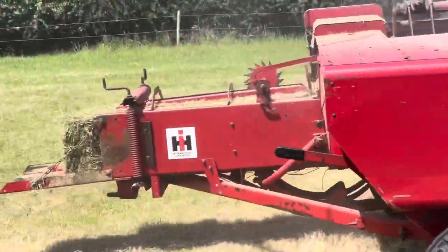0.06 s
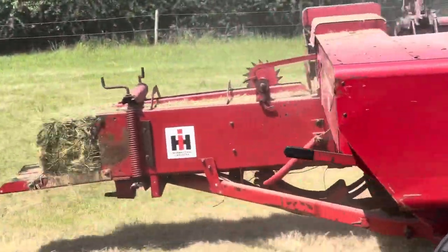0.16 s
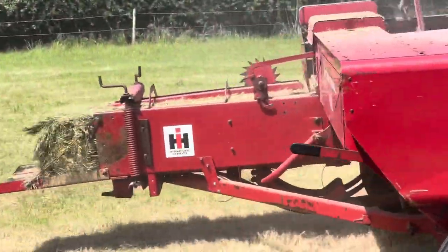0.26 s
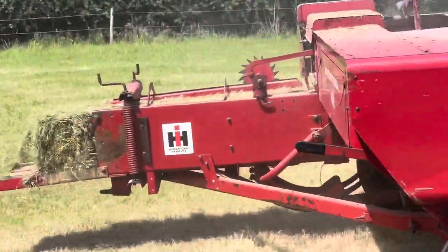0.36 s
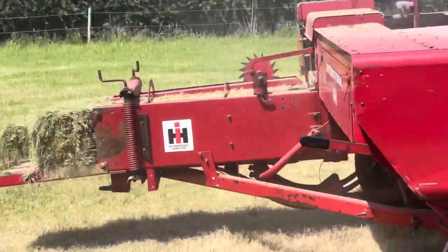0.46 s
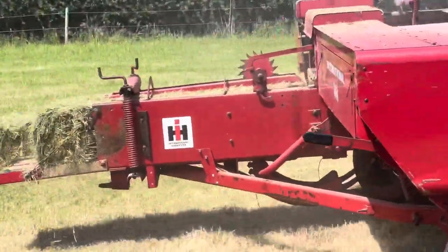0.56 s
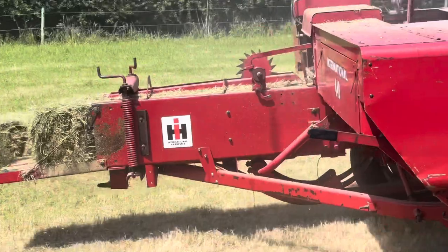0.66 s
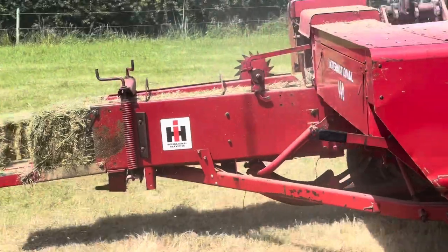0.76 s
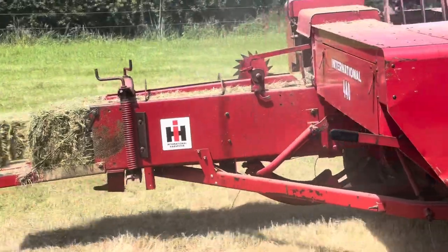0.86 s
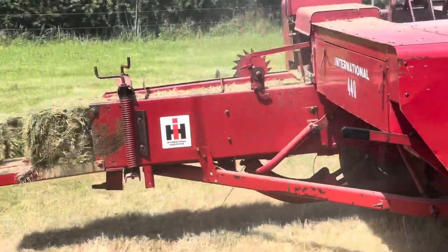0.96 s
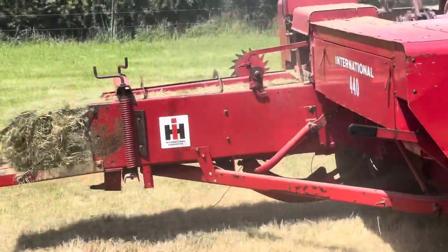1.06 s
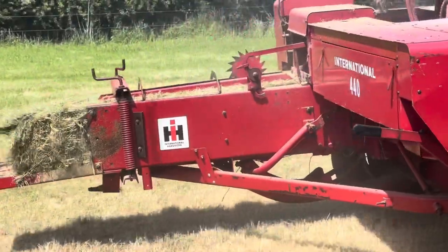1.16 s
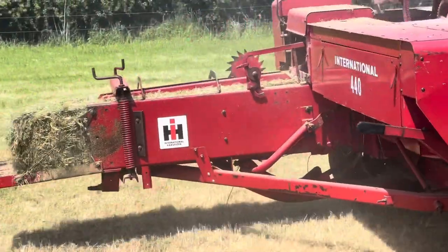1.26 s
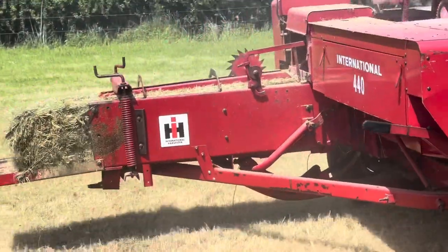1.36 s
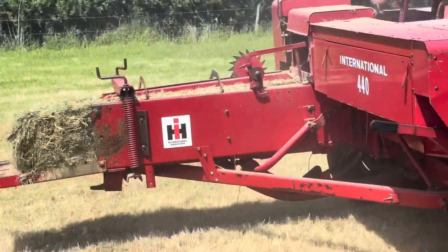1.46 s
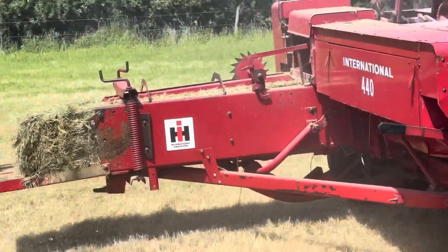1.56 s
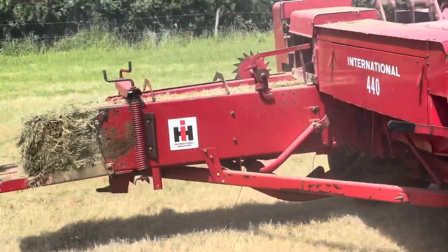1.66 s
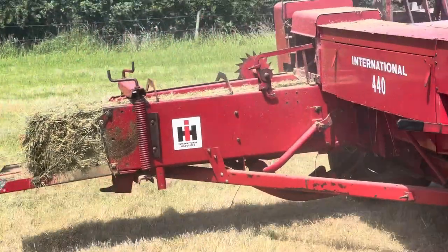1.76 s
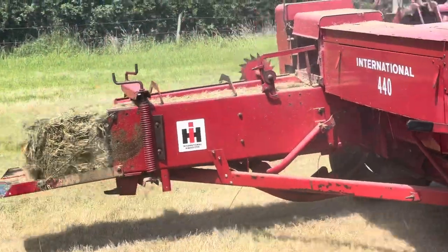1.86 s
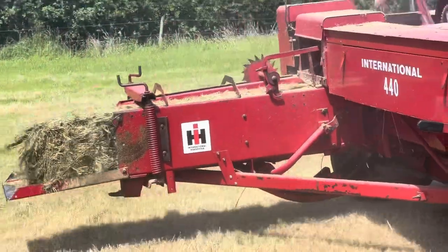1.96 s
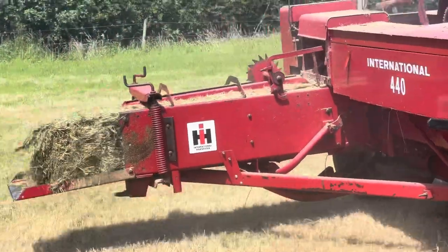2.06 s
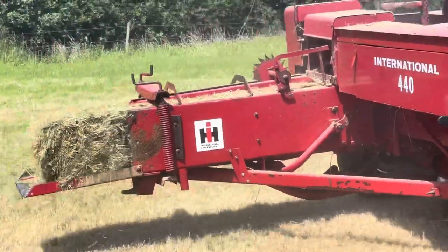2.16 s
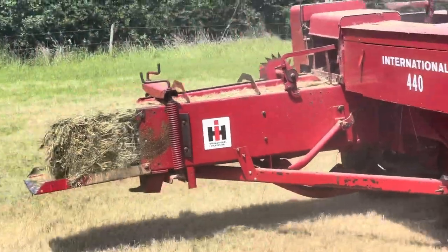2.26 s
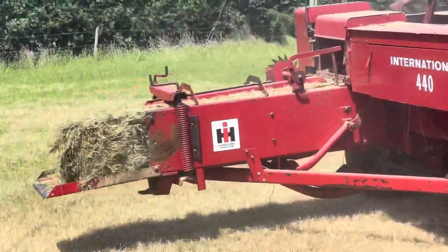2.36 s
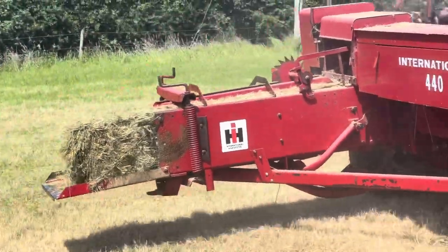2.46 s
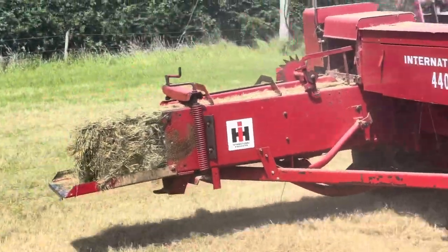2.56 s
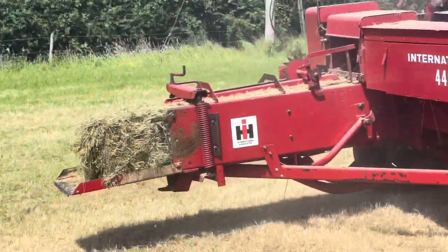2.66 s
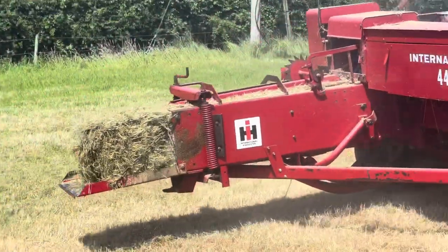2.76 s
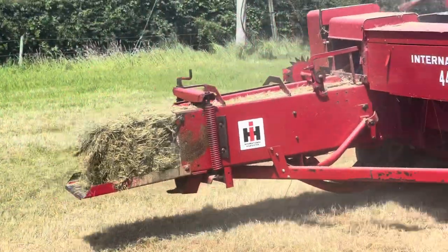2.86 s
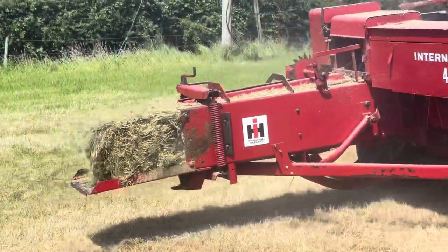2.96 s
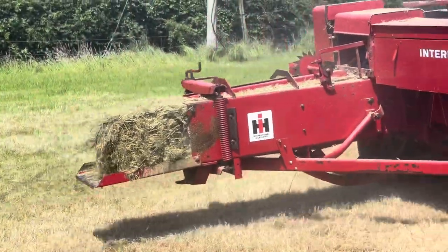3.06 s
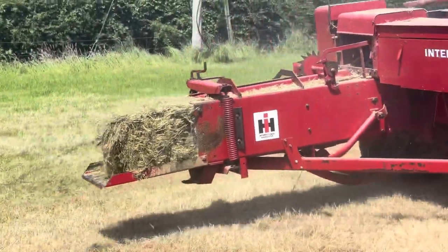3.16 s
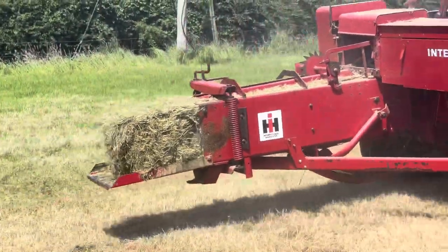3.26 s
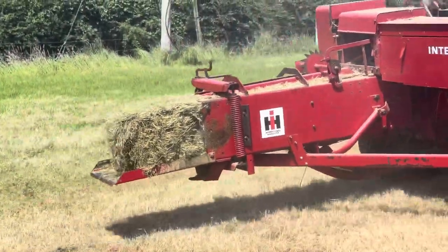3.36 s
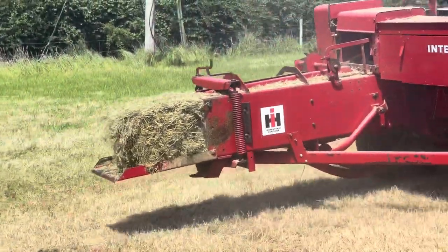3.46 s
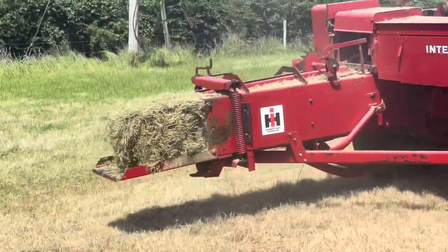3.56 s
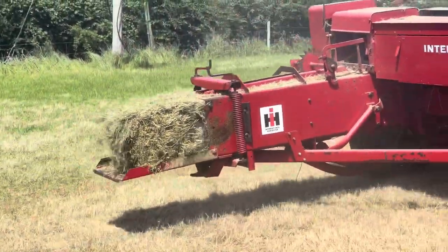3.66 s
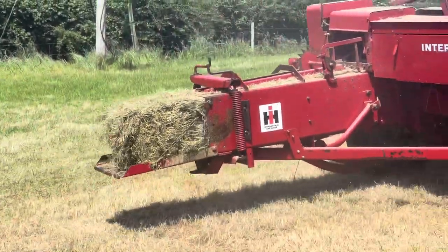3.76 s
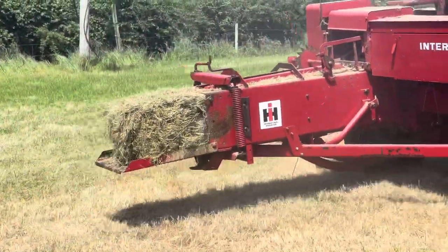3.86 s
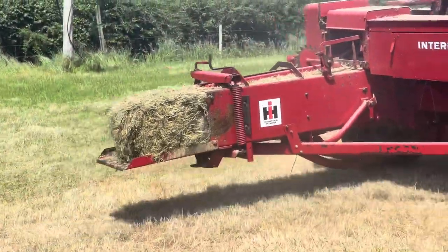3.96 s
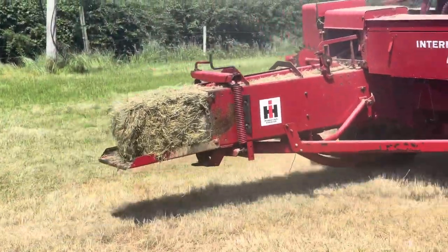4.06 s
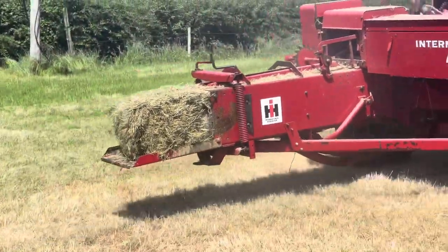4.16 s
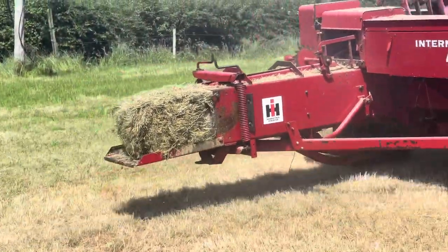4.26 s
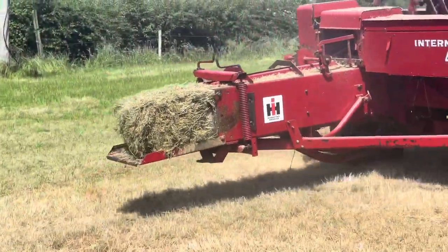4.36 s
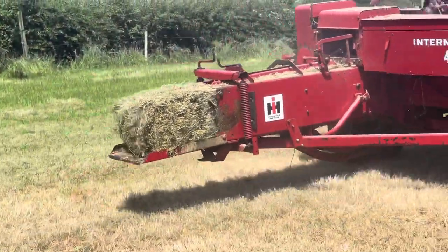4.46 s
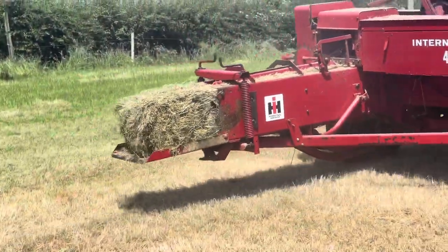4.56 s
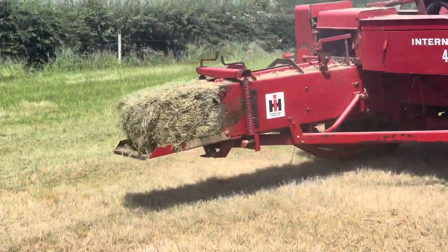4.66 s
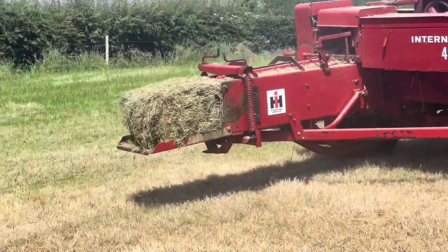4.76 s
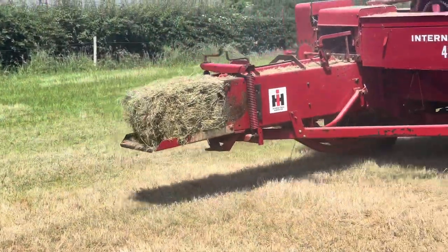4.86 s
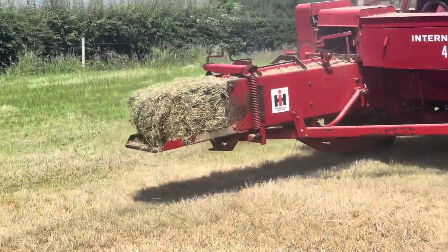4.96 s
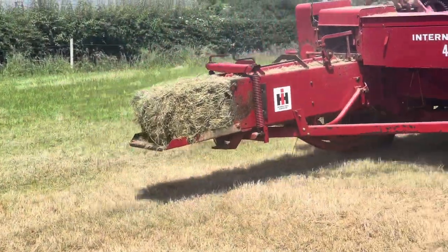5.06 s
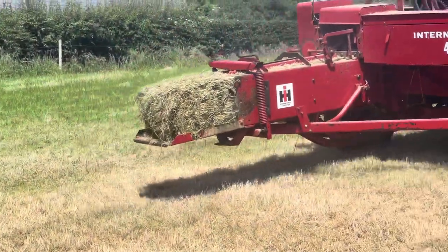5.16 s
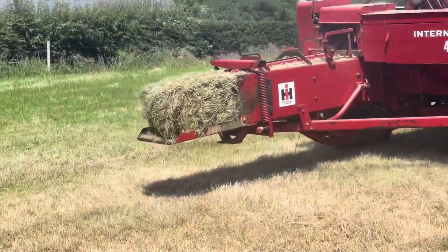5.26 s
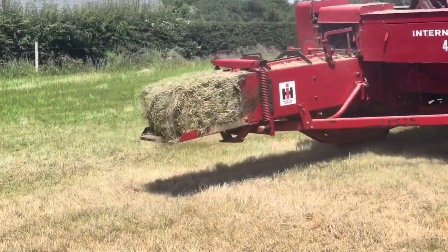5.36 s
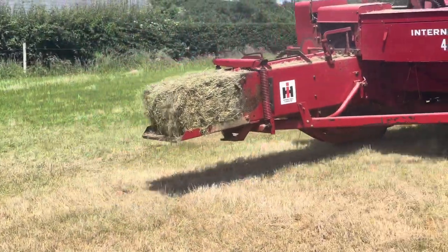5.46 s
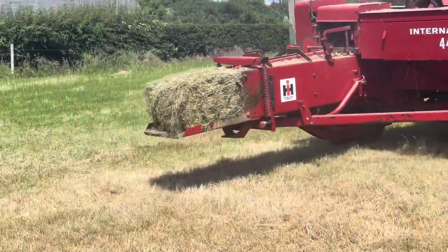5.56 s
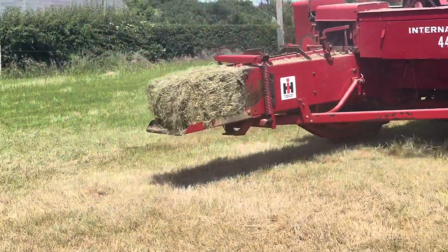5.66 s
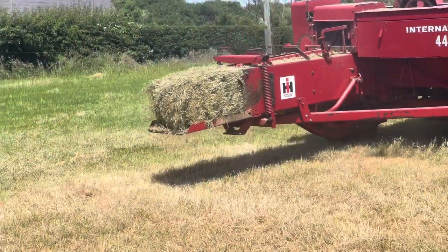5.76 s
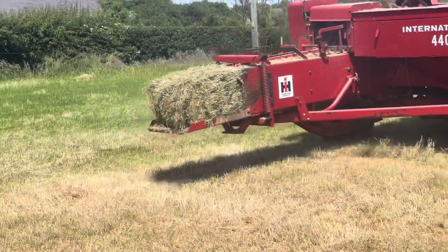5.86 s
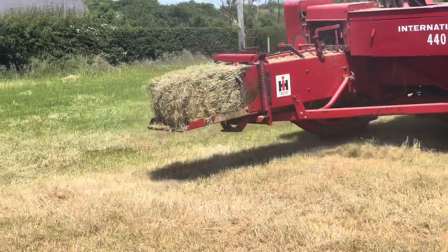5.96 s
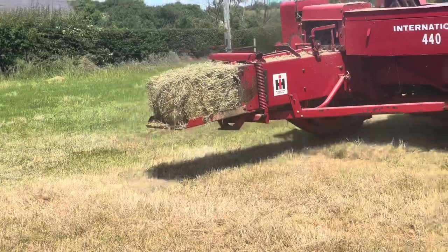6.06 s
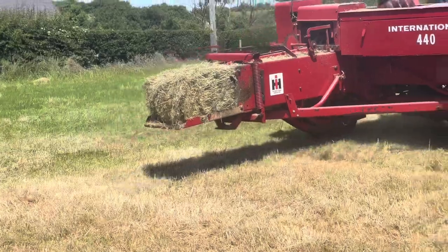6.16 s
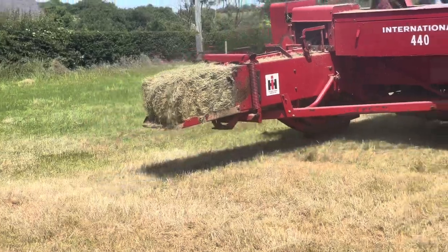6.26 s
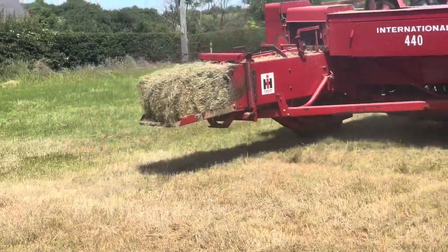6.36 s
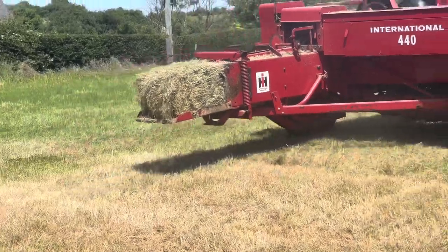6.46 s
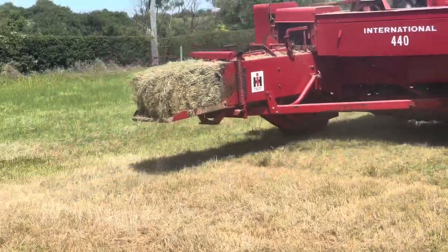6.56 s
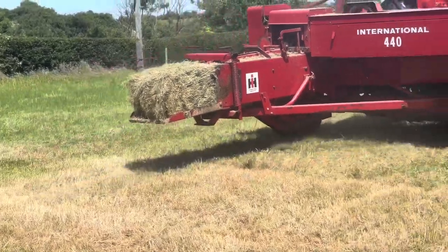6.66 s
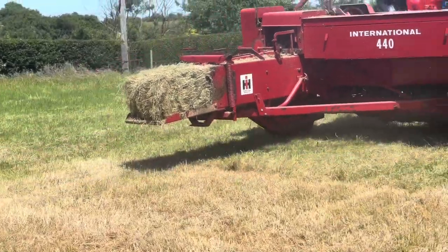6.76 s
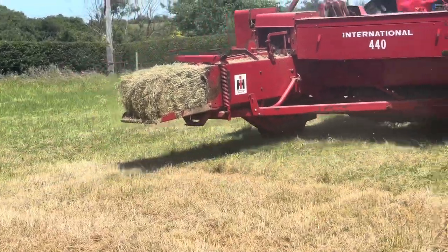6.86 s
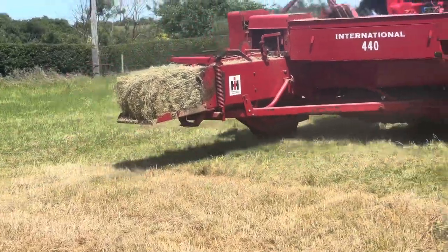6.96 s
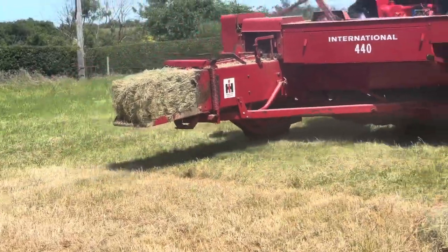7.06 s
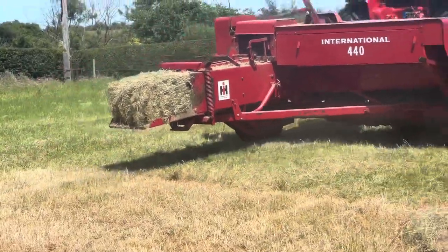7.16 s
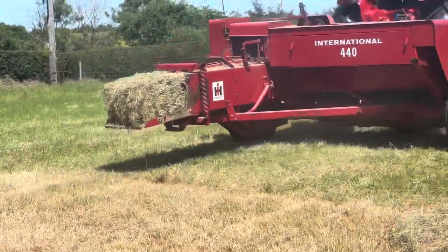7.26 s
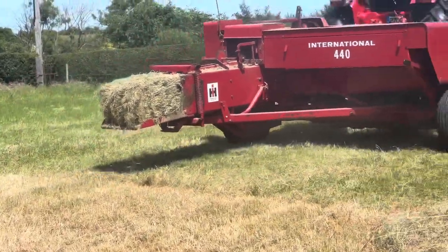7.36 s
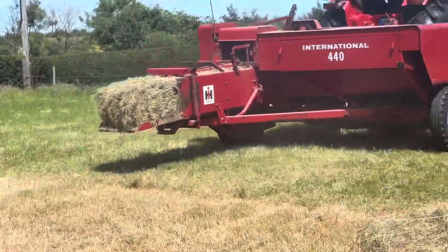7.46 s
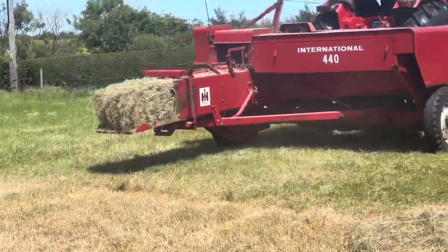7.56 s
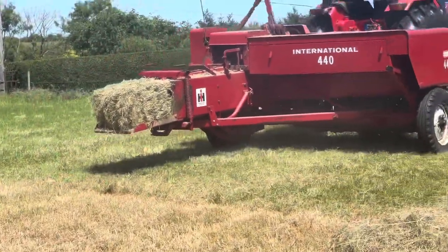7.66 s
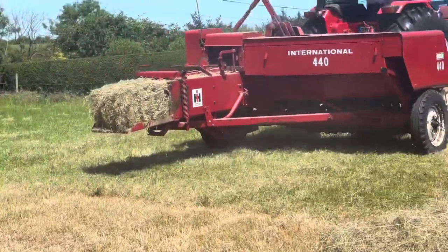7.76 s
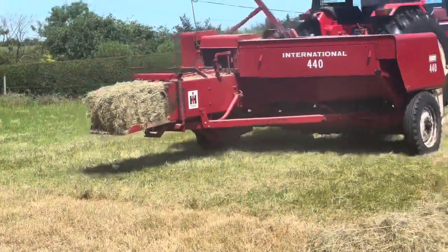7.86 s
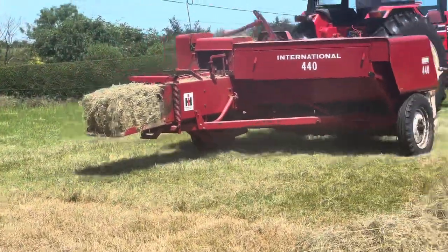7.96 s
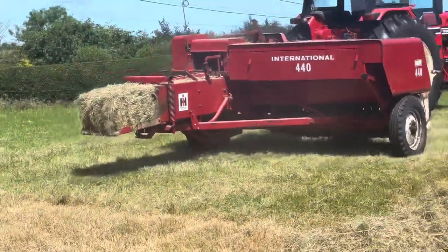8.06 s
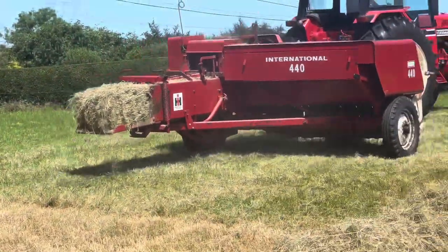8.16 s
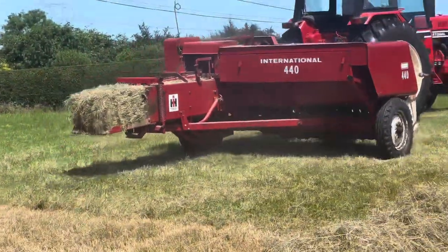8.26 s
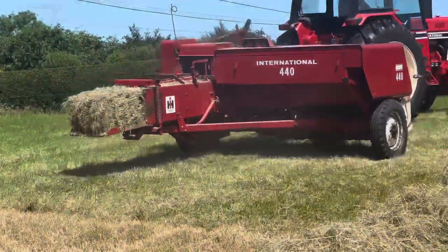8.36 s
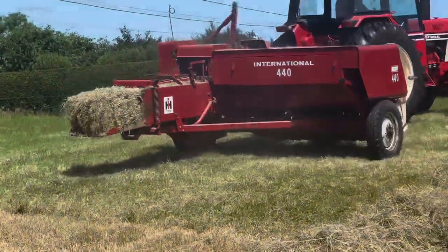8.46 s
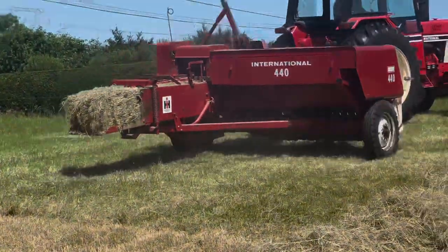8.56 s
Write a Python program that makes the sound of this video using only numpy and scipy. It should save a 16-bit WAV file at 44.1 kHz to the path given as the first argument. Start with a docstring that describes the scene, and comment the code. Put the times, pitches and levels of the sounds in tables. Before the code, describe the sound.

A hay baler works behind a droning tractor, with sharp regular plunger knocks, metallic ticking, chain clatter and hissing hay.

```python
"""Hay baler behind a diesel tractor

A small square baler works hay in an open field, drawing slowly away. The periodic firing of four
cylinders makes the exhaust drone; the sheet-steel body booms and clatters, gears whine and hay hisses.
Impacts excite resonant modes: the plunger knocks once a stroke and the pickup ticks five times a stroke.
Two close microphone ports hear it, and the peaks are limited and clipped."""
import sys
import numpy as np
from scipy import signal
from scipy.fft import rfft, irfft, next_fast_len
from scipy.io import wavfile
from scipy.ndimage import uniform_filter1d, minimum_filter1d, map_coordinates

SR = 44100
rng = np.random.default_rng(int(sys.argv[2]) if len(sys.argv) > 2 else 0)


def store_wav(level_fs):
    """Save 16-bit WAV to argv[1]."""
    pcm = np.round(np.clip(np.atleast_2d(level_fs), -1, 1) * 32767)
    wavfile.write(sys.argv[1], SR, pcm.T.astype(np.int16))


N = 380141
TIME = np.arange(N) / SR
FIRING_HZ, STROKE_S = 66.36, .8567  # mean firing rate; one turn of the plunger crank
SHARED = [[1], [0]]  # row 0 is common to both ports, row 1 is scattered sound


def amp(db):
    return 10 ** (np.asarray(db) / 20)

def unit_rms(x):
    return x / np.sqrt(np.mean(x ** 2) + 1e-20)

def log_interp(points, hz):
    """Interpolation on a logarithmic frequency axis."""
    knots_hz, values = np.transpose(points)
    return np.interp(np.log(hz + 1), np.log(knots_hz + 1), values)

def curves(rows):
    """Linear interpolation in time, one curve for each later column."""
    times, *columns = np.transpose(rows)
    return [np.interp(TIME, times, column) for column in columns]

def wobble(rate):
    """Smooth random modulation: a spline with `rate` knots a second."""
    at = np.arange(0, N + 16, 16)
    knots = rng.standard_normal(int(N * rate / SR) + 4)
    return np.interp(np.arange(N), at, map_coordinates(knots, [at * rate / SR]))

def filtered(x, response):
    """Linear filtering: the spectrum times a frequency response."""
    size = next_fast_len(N + 8192)
    return irfft(rfft(x, size) * response(np.fft.rfftfreq(size, 1 / SR)), size)[..., :N]

def noise(spectrum, envelope):
    """Two independent noises under one envelope, coloured, at unit rms."""
    white = envelope * rng.standard_normal((2, N))
    return unit_rms(filtered(white, lambda hz: amp(log_interp(spectrum, hz))))


# Firing tone (time [s], level [dB])
FIRING_LEVEL = [(0, -20), (.3, -16), (1.3, -16), (2.4, -20), (3.2, -15), (4.2, -19), (5.3, -16.5),
                (5.8, -17), (6.7, -24.5), (7.3, -11), (7.7, -17.5), (8.15, -17), (8.35, -32), (8.62, -30)]
# Shaft orders (multiple of the firing rate, relative level [dB])
SHAFT_ORDERS = [(0.501, -36), (.75, -30), (1.25, -20.5), (1.5, -9.5), (2, -7), (2.5, -18.5), (3, -15.5),
                (4, -19), (5, -15.5)]

def engine(boom_db, sag_hz=.72, sag_skew=.3, mesh_order=60, mesh_db=-25.5):
    """Frequency modulation: each stroke's load swings the firing tone, which beats with a steady gear."""
    crank = 2 * np.pi * (TIME - .78) / STROKE_S
    swing = np.sin(crank) - sag_skew / 2 * np.cos(2 * crank)  # quick drop, slow recovery
    firing_phase = 2 * np.pi * FIRING_HZ * TIME + sag_hz * STROKE_S * swing + .05 * wobble(6)
    orders = sum(amp(db + 3.74 * wobble(7)) * np.sin(order * firing_phase + 1.21 * wobble(3))
                 for order, db in SHAFT_ORDERS)
    orders *= amp(.5 * (boom_db - boom_db.mean()) - 16.5)  # radiated by the booming panels
    mesh_cycles = FIRING_HZ * .02 + mesh_order / STROKE_S * (TIME - .02)  # first beat near 0.02 s
    mesh = amp(mesh_db) * np.sin(2 * np.pi * mesh_cycles)
    level_db, = curves(FIRING_LEVEL)
    tone = amp(level_db + 1.1 * wobble(5)) * np.sin(firing_phase)
    return np.sqrt(2) * (tone + mesh + orders) * SHARED, firing_phase


# Panel boom (time [s], level [dB])
PANEL_LEVEL = [(0, -9.5), (.9, -9), (1.5, -12.5), (1.9, -8.5), (2.35, -17), (2.65, -11), (3.5, -13),
               (4.1, -14), (4.7, -14), (5.9, -14.5), (6.6, -16.5), (7, -13.5), (7.45, -17.5), (8.25, -14.5),
               (8.32, -26), (8.55, -17.5), (8.62, -28)]
# Lull at plunger reversal (time [s], depth [dB])
REVERSAL_DIP = [(0, 4.5), (4.5, 4), (8.62, 0)]

def boom_level(first_lull_s=.21, lull_width_s=.059):
    """Amplitude modulation, in dB: the panels swell each half stroke and lull as the plunger reverses."""
    level_db, = curves(PANEL_LEVEL)
    depth_db, = curves(REVERSAL_DIP)
    half = STROKE_S / 2
    from_lull = (TIME - first_lull_s + half / 2) % half - half / 2
    lull = np.exp(-.5 * (from_lull / lull_width_s) ** 2)
    swell_db = np.sin(-2 * np.pi * from_lull / half)
    return level_db + depth_db * (lull.mean() - lull) + swell_db + 2.34 * wobble(14)


# Boom spectrum (frequency [Hz], relative density [dB])
BOOM_SPECTRUM = [(15, -49), (32, -23), (50, -18), (82, -20), (100, -7), (120, -0.5), (139, 1.5),
                 (200, -8.5), (260, -21), (340, -74), (570, -120)]
# Growl spectrum (frequency [Hz], relative density [dB])
GROWL_SPECTRUM = [(120, -44), (200, -2.5), (248, -7), (322, -4.5), (366, -8), (415, -13), (645, -17),
                  (700, -23), (800, -14), (1040, -44), (1760, -120)]

def panels(firing_phase, boom_db, growl_db):
    """Forced vibration: steel panels radiate two low noise bands that pulse with the firings."""
    boom = noise(BOOM_SPECTRUM, 1 + .13 * np.cos(firing_phase))
    power = np.abs(uniform_filter1d(boom[0] ** 2, 1800))
    steady_boom = unit_rms(boom / (power + .037) ** .475)  # most random swelling is divided out
    growl = amp(growl_db + 1.3 * wobble(3.984)) * noise(GROWL_SPECTRUM, 1 + .2 * np.cos(firing_phase))
    return amp(boom_db) * steady_boom + growl


# Chain clatter (frequency [Hz], relative density [dB])
CHAIN_SPECTRUM = [(320, -15.5), (550, -1.5), (644, -4), (694, -5), (782, -1.5), (1050, -3), (1240, -0.5),
                  (1440, -3), (1680, -10), (1880, -2.5), (2120, -5.5), (2520, -5), (2930, -12), (3300, -20),
                  (4290, -27), (7260, -120)]

def chains(firing_phase, jolts):
    """Dense impacts merge into noise that pulses with the firings."""
    pulse = 1 + .063 * np.cos(firing_phase)
    return noise(CHAIN_SPECTRUM, pulse * amp(.94 * jolts + .65 * wobble(200)))


# Hay hiss (frequency [Hz], relative density [dB])
HAY_SPECTRUM = [(2300, -22), (3000, 2), (4400, -1.5), (5300, -5), (7000, -4.5), (9000, -10.5),
                (11000, -22.5), (13000, -21), (16500, -23)]

def hay(jolts):
    """Friction noise: hay slides unevenly through the chamber."""
    return noise(HAY_SPECTRUM, amp(1.26 * jolts + .69 * wobble(17) + 1.1 * wobble(300)))


# Gear meshes (mean frequency [Hz], starting level [dB])
GEAR_TONES = [(314.5, -30), (662, -37), (746, -36), (927, -36), (2340, -40), (2530, -36)]

def gears(firing_phase, clatter_db, wander_rad_per_hz=.0007, fade_db_per_s=.5):
    """Tooth-mesh tones follow the shaft speed and flicker under the uneven load."""
    rad_per_hz = firing_phase / FIRING_HZ
    tones = sum(amp(db + 3.94 * wobble(9)) * np.sin(hz * (rad_per_hz + wander_rad_per_hz * wobble(12)))
                for hz, db in GEAR_TONES)
    fade = amp(clatter_db - clatter_db[0] - fade_db_per_s * TIME)  # the baler turns away
    return fade * np.sqrt(2) * tones * SHARED


# Cylinder firings (place in the engine cycle [0-1], relative level [dB])
FIRINGS = [(.075, 0.5), (.335, -3), (.55, -8), (.82, -16)]
# Engine block modes (frequency [Hz], bandwidth [Hz], relative level [dB])
BLOCK_MODES = [(2488, 180, 0.5), (1870, 280, -10.5), (3410, 430, -17.5)]

def combustion(clatter_db, jitter_s=.00049, decay_s=.003):
    """Impulse excitation: each firing raps the block's resonances with a noise burst."""
    place, db = np.transpose(FIRINGS)
    cycles = np.arange(int(N / SR * FIRING_HZ / len(place)) - 1)[:, None]
    scatter = rng.standard_normal((len(cycles), len(place), 2))
    times = (cycles + place) * len(place) / FIRING_HZ + jitter_s * scatter[..., 0]
    raps = np.bincount((times * SR).astype(int).ravel(), amp(db + 1.7 * scatter[..., 1]).ravel(), N)
    bursts = signal.lfilter([1], [1, -np.exp(-1 / (decay_s * SR))], raps) * rng.standard_normal(N)
    block = lambda f: sum((-1) ** k * amp(level) * 1j * f * width / (hz * hz - f * f + 1j * f * width)
                          for k, (hz, width, level) in enumerate(BLOCK_MODES))
    return amp(clatter_db - 11) * unit_rms(filtered(bursts, block)) * SHARED


def clinks(per_s=60, softest_db=-48, centre_hz=5500, t60_s=.03):
    """Free decay: loose tines and links touch at random, each ringing at its own pitch."""
    out, t = np.zeros(N + SR), np.arange(SR // 20) / SR
    for place, size, pitch in rng.random((int(N / SR * per_s), 3)):
        hz = centre_hz * np.exp(1.1 * (pitch - .5))
        envelope = amp(softest_db - 3.5 * np.log(1 - size) - 60 * t / t60_s)
        out[int(place * N):][:len(t)] += envelope * np.sin(2 * np.pi * hz * t)
    return out[:N] * [[1], [.3]]


# Plunger knocks, and the pickup ticks that land right after them
# (time [s], crack [dB], ring [dB], ring centre [Hz], floor for outer modes [dB])
IMPACTS = [(0.0494, -13.5, -16.5, 2720, -6), (.1461, -12, -6.5, 1440, -13), (0.9926, -13, -11, 1320, -11),
           (1.0076, -18, -11, 1460, -12), (1.8664, -8.5, -7, 1330, -13), (2.7177, -11.5, -9.5, 2110, -15),
           (2.734, -12, -15, 1500, -3.5), (2.7646, -26, -17.5, 1270, -6.5), (2.8324, -35, -23, 2550, -13),
           (3.5747, -11, -13, 2050, -14), (4.4363, -13, -13, 2100, -11), (4.4688, -16.5, -18.5, 1130, -11),
           (5.2824, -14, -12, 1860, -13), (5.2906, -17.5, -11, 1610, -9.5), (5.314, -21, -16, 1040, -11),
           (6.1407, -17, -13.5, 2090, -16), (6.153, -18, -15, 1150, -7), (6.9968, -18, -16, 1850, -11),
           (7.004, -16.5, -18.5, 960, -4), (7.033, -18, -33, 1256, -10), (7.8596, -15.5, -16.5, 1600, -5.5),
           (7.8678, -19, -21, 1880, -10), (7.889, -23.5, -19, 1300, -10)]
# Bale chamber modes (frequency [Hz])
CHAMBER_MODES = [480, 617, 865, 970, 1157, 1290, 1433, 1501, 1616, 1867, 2056, 2270, 2474, 2804]
# Impact crack (frequency [Hz], relative density [dB])
CRACK_SPECTRUM = [(400, -21), (800, 14.5), (2500, 4), (4500, 2.5), (7000, 0.5), (9000, -6), (12000, -11),
                  (16500, -11)]

def stroke_impacts(hold_s=.0075, snap_t60_s=.012):
    """Modal response: a plunger knock, or a pickup tick just after it, cracks and rings briefly."""
    crack, ring, t = np.zeros(N + SR), np.zeros(N + SR), np.arange(SR // 4) / SR
    envelope = lambda t60_s: (1 - np.exp(-t / .00036)) * amp(-60 * np.maximum(t - hold_s, 0) / t60_s)
    hard_front = 1 + .8 * amp(-60 * t / snap_t60_s)
    for start_s, crack_db, ring_db, centre_hz, floor_db in IMPACTS:
        detune, strength = rng.standard_normal((2, len(CHAMBER_MODES)))
        pitches = CHAMBER_MODES * (1 + .012 * detune)
        nearness = 1 / (1 + (np.log(pitches / centre_hz) / .1) ** 2)
        levels = np.maximum(nearness, amp(floor_db)) * amp(1.9 * strength)
        modes = levels @ np.sin(2 * np.pi * pitches[:, None] * t)
        crack[round(start_s * SR):][:len(t)] += amp(crack_db) * envelope(t60_s=.077) * hard_front
        ring[round(start_s * SR):][:len(t)] += amp(ring_db) * envelope(t60_s=.072) * modes
    chatter = amp(1.3 * wobble(500))  # loose parts shake within the blow
    return crack[:N] * noise(CRACK_SPECTRUM, chatter) + ring[:N] * SHARED


# Pickup ticks (time [s], rattle [dB], ring [dB])
TINE_TICKS = [(.3194, -33, -40), (.5294, -25, -47), (.8475, -30, -45), (1.0294, -25, -31),
              (1.216, -25, -35), (1.37, -25.5, -39), (2.053, -24, -45), (2.243, -22.5, -43),
              (2.407, -24.5, -36), (3.0859, -24, -34), (3.271, -26, -37), (3.432, -20, -38),
              (3.6192, -24, -46), (3.783, -23, -35), (3.9548, -21, -40), (4.13, -21, -30),
              (4.301, -23, -32), (4.4818, -28, -34), (4.6454, -24, -35), (4.783, -26.5, -44),
              (4.804, -21, -30), (4.9784, -22.5, -40), (5.034, -28, -32), (5.154, -21.5, -39),
              (5.322, -28, -34), (5.492, -21.5, -23), (5.6365, -26, -36), (5.657, -23.5, -33),
              (5.8247, -23.5, -24), (6.003, -22, -33), (6.054, -26, -30), (6.1714, -22.5, -30),
              (6.1894, -32, -34), (6.338, -22, -34), (6.5166, -22.5, -32), (6.6034, -27, -25),
              (6.6752, -20.5, -35), (6.86, -23.5, -26), (7.2045, -33, -35), (7.3665, -19, -31),
              (7.3818, -26.5, -36), (7.5482, -23, -25), (7.7268, -25.5, -24.5), (7.9025, -27.5, -25),
              (8.0786, -27, -33), (8.2479, -23, -31), (8.419, -26.5, -28), (8.5953, -28.5, -30)]
# Tine modes (frequency [Hz], relative level [dB], 60 dB decay time [s])
TINE_MODES = [(3220, -9, .05), (4161, -8, .06), (4430, 2, 0.091), (5700, -6, .06), (6449, -5, .08),
              (6821, -5, .07), (8156, -11, .07), (8586, -10, .06)]
# Tine rattle (frequency [Hz], relative density [dB])
RATTLE_SPECTRUM = [(1500, -18), (3000, 3), (3900, -4.5), (4400, 3), (4900, -4), (6300, 2), (7500, 0.5),
                   (9000, -5), (12000, -13), (16500, -10)]

def pickup(rattle_s=.03):
    """Damped vibration: a tine bar snaps over its cam, rings thinly and rattles on."""
    rattle, ring, t = np.zeros(N + SR), np.zeros(N + SR), np.arange(SR // 4) / SR
    attack = 1 - np.exp(-t / .0018)
    decay = amp(-60 * t / .041) + .59 / (1 + (t / rattle_s) ** 4)
    for start_s, rattle_db, ring_db in TINE_TICKS:
        modes = sum(amp(db + 3.8 * rng.standard_normal() - 60 * t / t60)
                    * np.sin(2 * np.pi * hz * rng.normal(1, .0078) * t) for hz, db, t60 in TINE_MODES)
        rattle[round(start_s * SR):][:len(t)] += amp(rattle_db) * attack * decay
        ring[round(start_s * SR):][:len(t)] += amp(ring_db) * modes
    return rattle[:N] * noise(RATTLE_SPECTRUM, amp(2.1 * wobble(400))) + ring[:N] * SHARED


# Working noise (time [s], growl [dB], clatter [dB], hay hiss [dB])
WORK_LEVELS = [(0, -16.5, -20.5, -27.5), (1.03, -18.5, -20.5, -29.5), (1.85, -19, -20, -28.5),
               (3.2, -21.5, -22, -31.5), (4.4, -21, -21.5, -32.5), (5, -24, -22.5, -33),
               (5.54, -19, -23, -33), (6.1, -22.5, -23.5, -34.5), (6.9, -21, -25, -32.5),
               (7.56, -21, -25, -35), (8, -21, -21, -32.5), (8.3, -23, -23.5, -33), (8.62, -30, -28, -36.5)]

def scene():
    """Superposition: all sources add into a shared row and a scattered row."""
    growl_db, clatter_db, hiss_db = curves(WORK_LEVELS)
    boom_db = boom_level()
    mix, firing_phase = engine(boom_db)
    mix += panels(firing_phase, boom_db, growl_db)
    jolts = wobble(45)  # small knocks of links and bearings
    mix += amp(clatter_db) * chains(firing_phase, jolts) + amp(hiss_db) * hay(jolts)
    mix += gears(firing_phase, clatter_db) + combustion(clatter_db)
    return mix + stroke_impacts() + pickup() + clinks()


# Likeness of the ports (frequency [Hz], coherence [0-1])
PORT_COHERENCE = [(60, 0.99), (130, 0.99), (290, 0.99), (640, 0.98), (1410, 0.83), (2400, 1), (3300, 1),
                  (4400, 1), (7500, 1), (10000, 1), (15000, 1)]
# Port balance (frequency [Hz], left minus right [dB])
PORT_BALANCE = [(60, 0.7), (380, .5), (700, -1), (1290, -2), (2000, -1.5), (2600, -0.6), (3600, 0)]
# Port phase (frequency [Hz], left lead [rad])
PORT_PHASE = [(0, 0.029), (600, -0.41), (1120, -0.52), (1700, -0.3), (2300, 0.068), (3000, 0.39), (4000, 0)]
# Stereo width, narrowing over time (time [s], side gain [dB])
SIDE_GAIN = [(0, 5.5), (2, 4), (4, 3.5), (6, 1), (7.2, -2.5), (8.62, -7)]

def microphone_ports(dry, slip_above_hz=8900, slip_zero_hz=8400, hz_per_turn=3620):
    """Partial coherence: two close ports hear nearly the same sound, apart in level and phase."""
    spread = lambda hz: np.arccos(np.clip(log_interp(PORT_COHERENCE, hz), -1, 1)) / 2
    shared, scattered = filtered(dry, lambda hz: np.array([np.cos(spread(hz)), np.sin(spread(hz))]))
    slip = lambda hz: 2 * np.pi * (slip_zero_hz - hz) / hz_per_turn
    phase = lambda hz: np.where(hz < slip_above_hz, np.interp(hz, *np.transpose(PORT_PHASE)), slip(hz))
    port = lambda hz: amp(log_interp(PORT_BALANCE, hz) / 2) * np.exp(.5j * phase(hz))
    pair = np.array([shared + scattered, shared - scattered])
    left, right = filtered(pair, lambda hz: np.array([port(hz), 1 / port(hz)]))
    side = filtered(left - right, lambda hz: (hz > 250) & (hz < slip_above_hz)) / 2
    side_db, = curves(SIDE_GAIN)
    widening = (amp(side_db) - 1) * side
    return np.array([left + widening, right - widening])

def record(dry):
    """Peak limiting: a fast limiter and full-scale clipping, then a bass cut and band limit."""
    limit_db, bass_cut_hz, top_hz = 3, 33, 15780
    pair = microphone_ports(dry)
    needed = np.minimum(1, amp(limit_db) / (np.abs(pair).max(0) + 1e-9))
    gain = uniform_filter1d(minimum_filter1d(needed, size=441), size=441)  # 10 ms windows
    clipped = np.clip(gain * pair, -1, 1)
    passband = lambda hz: (hz < top_hz) / np.sqrt(1 + (bass_cut_hz / (hz + 1)) ** 4)
    return np.clip(filtered(clipped, passband), -1, 1)


dry = scene()
out = record(dry)
store_wav(out)
```